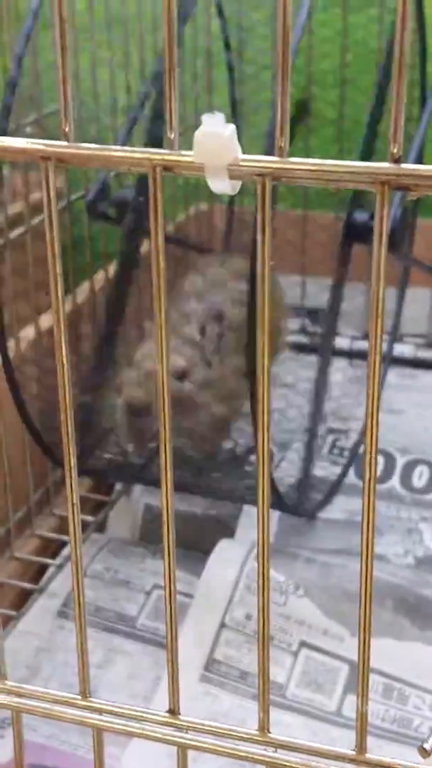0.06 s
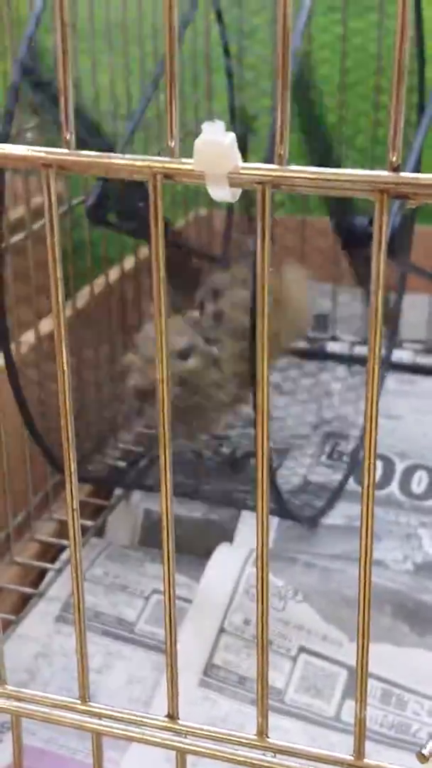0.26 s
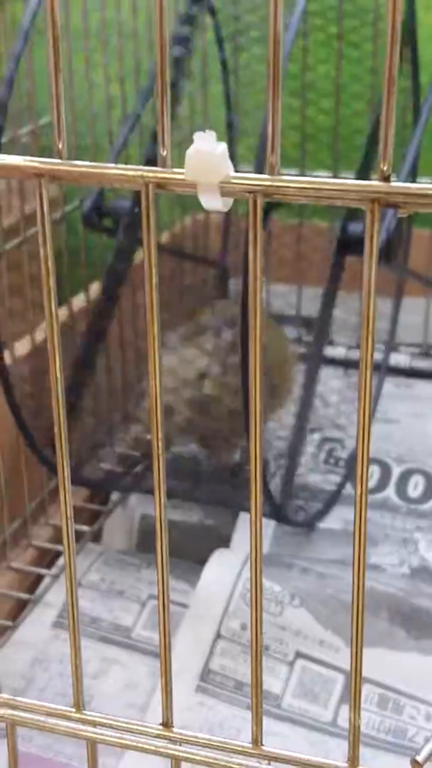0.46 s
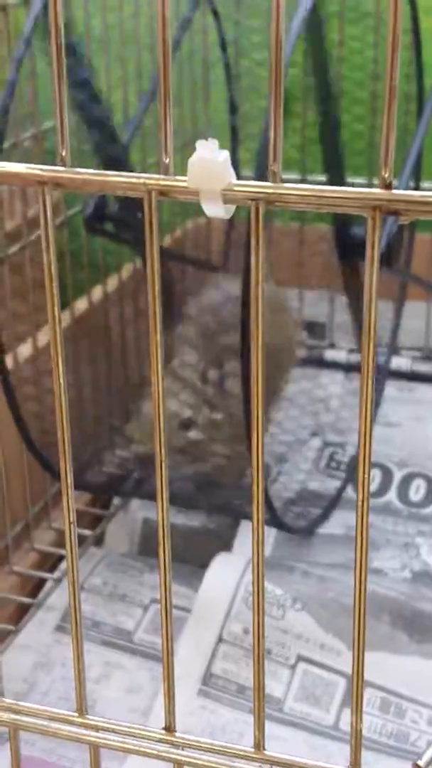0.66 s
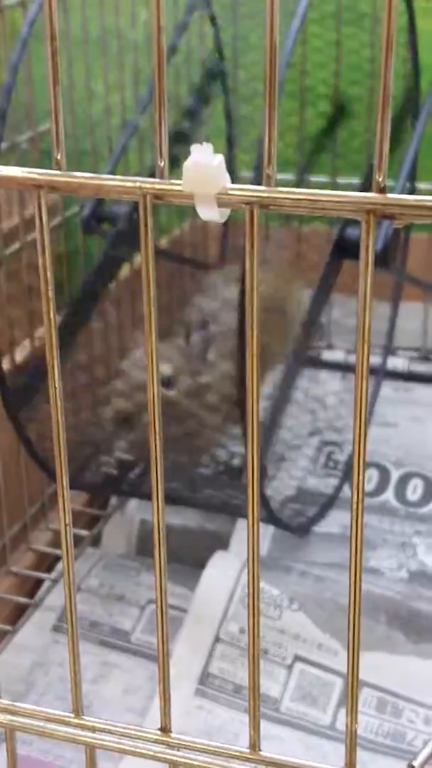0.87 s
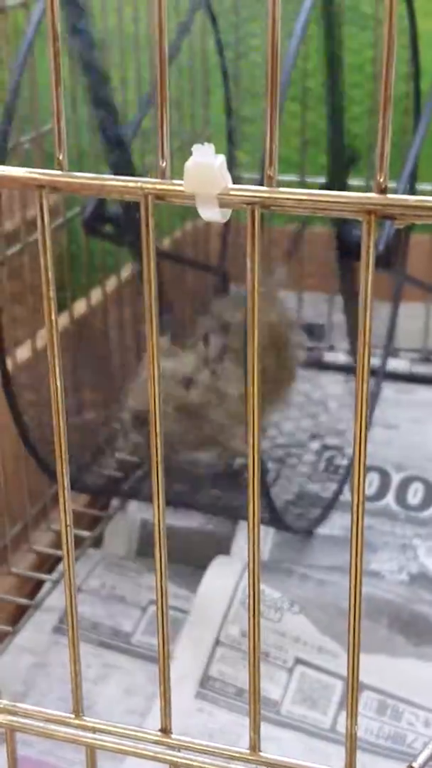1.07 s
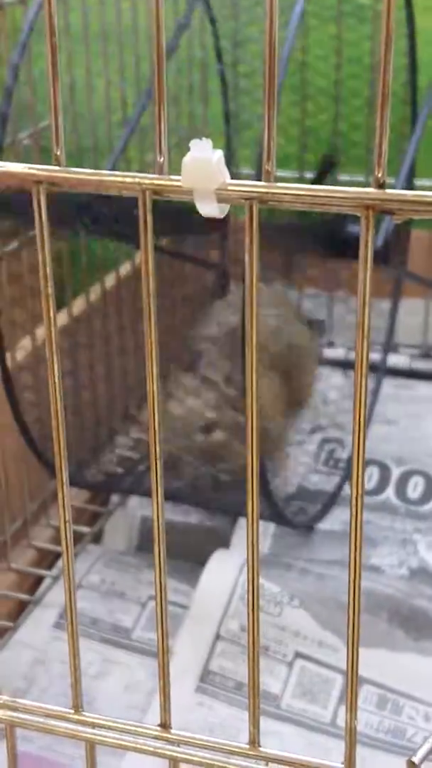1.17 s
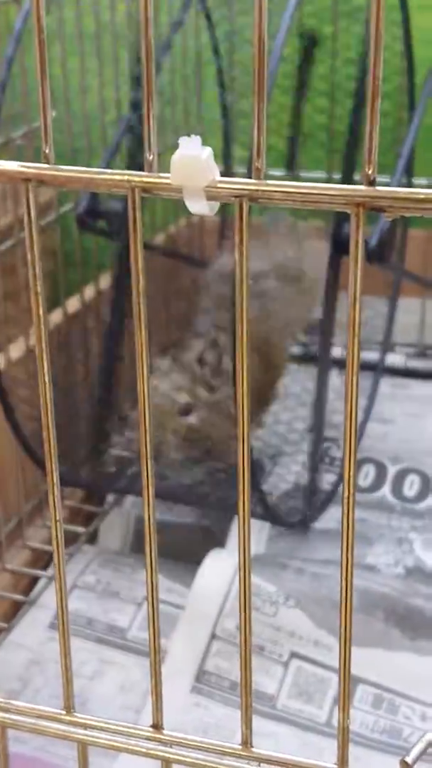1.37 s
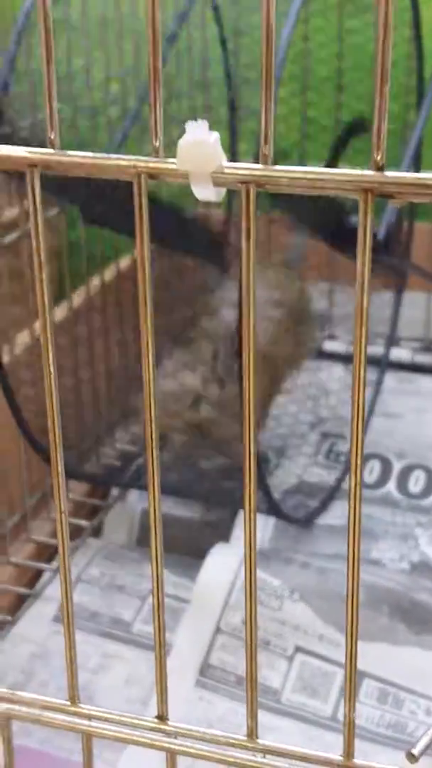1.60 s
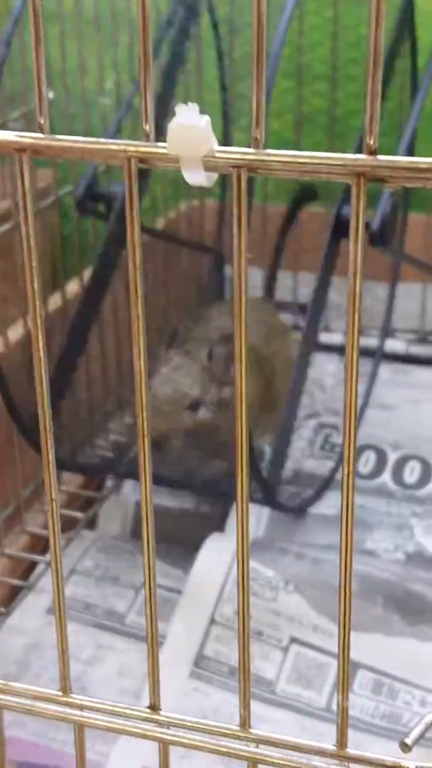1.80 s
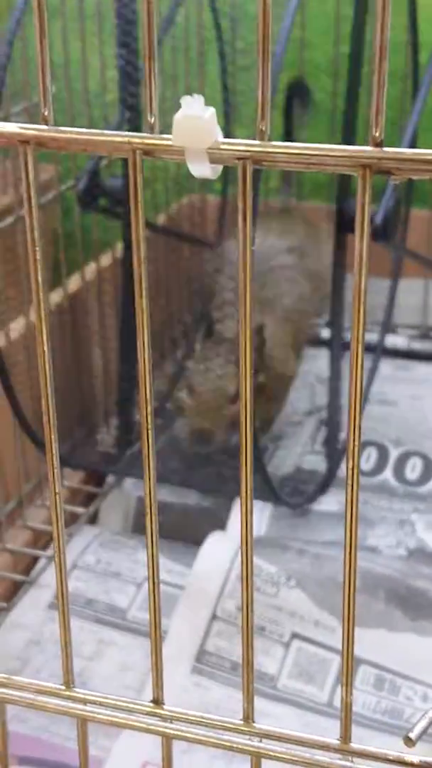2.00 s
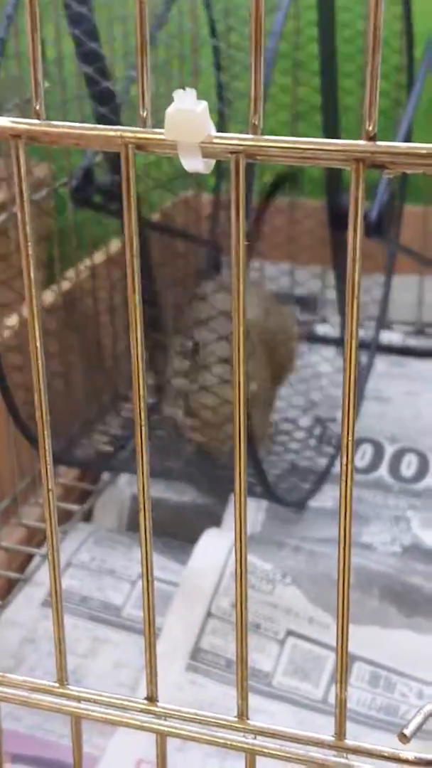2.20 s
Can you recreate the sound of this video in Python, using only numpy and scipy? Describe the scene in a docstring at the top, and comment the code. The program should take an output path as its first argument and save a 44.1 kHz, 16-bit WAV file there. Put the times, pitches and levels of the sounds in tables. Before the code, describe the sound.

High, short squeaks come from a small rodent or its running wheel, slightly to the right, ringing briefly in the room. They are raspy from 0.1 to 0.5 seconds, then clear and louder from 0.6 to 1.7, peaking around 0.8 and 1.4. A faint falling squeak follows at about 2 seconds. Feet patter and scuff lightly on the mesh throughout, over a low indoor rumble.

```python
"""A bare, echoing room: a small rodent runs in a mesh wheel inside a wire cage.
A quick run of high squeaks from the animal or its wheel, hoarse at first and then clear, rings on in
the room. Each is a gliding, wavering whistle with overtones, roughened by rasp and growl.
Feet patter and scuff on the mesh and ring the wheel, over a low indoor rumble."""
import sys
import numpy as np
from scipy import signal
from scipy.fft import rfft, irfft
from scipy.io import wavfile

SR = 44100
rng = np.random.default_rng(int(sys.argv[2]) if len(sys.argv) > 2 else 0)


def to_wav(s):
    """Save 16-bit WAV."""
    ch = np.atleast_2d(s).T  # columns
    pcm = np.round(np.clip(ch, -1, 1) * 32767)  # PCM
    wavfile.write(sys.argv[1], SR, pcm.astype(np.int16))


N = 99225
TIME_S = np.arange(N) / SR
FREQS_HZ = np.arange(N // 2 + 1) * SR / N

# Left-right likeness of noise: freq_hz, correlation
STEREO_CORRELATION = [(50, .9), (150, 1), (350, 0.59), (700, 0.85), (1400, .1), (5000, 0.052)]
# Indoor rumble and hiss: freq_hz, density_db
AIR_SPECTRUM = [(25, -39), (36, 1), (47, 1), (75, 2.5), (120, -9.5), (170, -4), (330, -18), (600, -25),
                (1400, -24.5), (3000, -25), (6000, -29), (9500, -53), (12000, -49), (15500, -67)]
# Footfalls on the wheel: peak_s, level_db
FOOTFALLS = [(.345, -41), (0.364, -58), (0.402, -46.5), (0.486, -45), (0.644, -43.5), (0.964, -45),
             (1.047, -47.5), (1.192, -39), (1.21, -69), (1.264, -41.5), (1.325, -41.5), (1.383, -40),
             (1.424, -41), (1.446, -45), (1.774, -39.5), (1.814, -46.5), (1.846, -46.5), (1.921, -44.5),
             (2.152, -39.5)]
# Feet scuffing the mesh: time_s, level_db
SCUFF_ENVELOPE = [(0, -47.5), (.12, -57), (.45, -51.5), (.8, -57), (1.15, -52.5), (1.40, -49.5),
                  (1.65, -55.5), (1.85, -52.5), (2.05, -52), (2.25, -53.5)]
# Mesh contact noise: freq_hz, density_db
MESH_SPECTRUM = [(120, -11.5), (220, 1), (350, -7), (560, -7.5), (900, -5), (1450, -6), (2150, -2.5),
                 (3200, -8), (5500, -21), (9000, -26), (12000, -46), (15500, -42)]
# Wheel resonances: freq_hz, width_hz, lift_db
WHEEL_RESONANCES = [(510, 150, 6), (595, 39, 11.5), (844, 67, 8), (1023, 61, 4), (1484, 16, 5.5),
                    (1800, 20, 1), (2150, 67, 2.5)]
# Noise in a squeak: freq_hz, density_db
RASP_SPECTRUM = [(1200, -26), (2200, 5), (3000, 18), (4400, 13.5), (6200, 14.5), (8500, 8.5), (10200, -2.5),
                 (12000, -6.5), (15500, -27)]
# A hoarse squeak repeats every third cycle: multiple_of_third_pitch, level_re_rasp_db
GROWL_PARTIALS = [(2, -7), (4, -11), (5, -8), (7, -20)]
# Squeaks; rows that touch are one squeak breaking to a new pitch:
# start_s, length_s, crest_share, start_hz, crest_hz, end_hz, level_db, octave_db, waver_share, rasp_db
SQUEAK_GLIDES = [ (0.116, 0.058, 0.24, 4730, 4450, 4110, -42, -34, 0.053, -16.5),
                 (0.147, 0.094, 0.58, 4000, 4035, 4053, -36, -18.5, .028, -12),
                 (0.227, 0.12, 0.52, 3600, 2698, 2660, -40.5, -34, 0.043, -7.5),
                 (0.311, 0.046, 0.44, 2843, 2853, 2770, -35, -10, 0.021, -17),
                 (0.311, .080, .60, 4080, 4159, 4280, -31.5, -19, 0.024, -5.5),
                 (0.461, 0.04, 0.362, 3036, 3077, 3343, -41, 6.5, 0.014, -0.5),
                 (0.473, 0.0635, 0.77, 4160, 4293, 4120, -28.5, -9.5, 0.014, -8),
                 (0.636, 0.081, 0.7, 4532, 4324, 4216, -23, -15, 0.031, -22),
                 (0.794, 0.025, 0.29, 1985, 1910, 1840, -45.5, -8, 0.015, -7),
                 (0.807, .056, 0.64, 3896, 4150, 4236, -19.5, -19, 0.023, -33.5),
                 (.856, 0.028, 0.474, 4466, 4514, 4136, -21.5, -27.5, 0.027, -19.5),
                 (0.969, 0.081, 0.29, 4380, 4594, 4367, -23.5, -17.5, 0.033, -37),
                 (1.046, 0.026, .50, 1920, 1890, 1800, -48.5, -13, .012, -5),
                 (1.127, 0.057, 0.597, 4685, 5054, 4690, -26.5, -13, 0.0388, -30),
                 (1.352, 0.056, 0.67, 3850, 4520, 4627, -30.5, -12, 0.019, -37),
                 (1.409, 0.039, 0.57, 4420, 4665, 4780, -17, -22, 0.028, -52),
                 (1.664, .054, .70, 4490, 4608, 4483, -24, -14.5, 0.027, -33),
                 (1.7, 0.041, 0.55, 4416, 4190, 4150, -25, -22, 0.023, -35),
                 (1.973, 0.095, 0.344, 3350, 3130, 2853, -52, -38, 0.035, -21),
                 (2.038, 0.077, 0.63, 2690, 2364, 2330, -48.5, -30, 0.048, -24), ]
# Microphone imbalance: freq_hz, left_minus_right_db
MIC_BALANCE = [(60, -2.5), (200, -5.5), (380, 4.5), (700, -4.5), (1300, -1.5), (4400, -2.5), (6500, -3),
               (8500, -9.5), (10200, -11.5), (13000, 0)]


def from_db(db):
    """Decibels to gain."""
    return 10 ** (np.asarray(db) / 20)


def unit_rms(x):
    """Scale to unit power."""
    return x / np.sqrt(np.mean(x ** 2) + 1e-20)


def at_hz(table, hz):
    """Read a table on a log-frequency axis."""
    freq_hz, value = np.transpose(table)
    return np.interp(np.log(hz + 1), np.log(freq_hz), value)


def drift(cutoff_hz):
    """Low-passed random motion, unit RMS."""
    pole = np.exp(-2 * np.pi * cutoff_hz / SR)
    white = rng.standard_normal(N + SR // 2)
    return unit_rms(signal.lfilter([1], [1, -2 * pole, pole * pole], white)[-N:])


def stereo_noise(spectrum):
    """Coloured noise, alike on both sides in the bass, diffuse in the treble."""
    mid, side = rfft(rng.standard_normal((2, N)))
    alike = at_hz(STEREO_CORRELATION, FREQS_HZ)
    pair = np.sqrt(1 + alike) * mid + np.sqrt(1 - alike) * np.array([side, -side])
    return unit_rms(irfft(pair * from_db(at_hz(spectrum, FREQS_HZ)), N))


def room(x, early_t60_s=0.044, late_t60_s=0.36, early_share=0.27, gap_s=0.00091):
    """Dense early reflections and a diffuse tail, different on each side."""
    t = TIME_S[:SR]
    early, late = (unit_rms(from_db(-60 * t / t60_s) * (t > gap_s))
                   for t60_s in (early_t60_s, late_t60_s))
    power = early_share * early ** 2 + (1 - early_share) * late ** 2
    response = rng.standard_normal((2, SR)) * np.sqrt(power / SR)
    return signal.fftconvolve(np.atleast_2d(x), response, axes=1)[:, :N]


def background(air_db=-48, hum_db=-61.5, hum_hz=68.9, waver_share=0.055):
    """Indoor rumble and hiss with a low wavering hum."""
    pitch_hz = hum_hz * (1 + waver_share * drift(cutoff_hz=8.3))
    hum = np.sqrt(2) * np.sin(2 * np.pi * np.cumsum(pitch_hz) / SR)
    return from_db(air_db) * stereo_noise(AIR_SPECTRUM) + from_db(hum_db) * hum


def wheel_ring(contact):
    """The wheel's resonances lift narrow bands of the contact noise."""
    ringing = np.zeros_like(contact)
    for freq_hz, width_hz, lift_db in WHEEL_RESONANCES:
        b, a = signal.iirpeak(freq_hz, freq_hz / width_hz, fs=SR)
        ringing += (from_db(lift_db) - 1) * signal.lfilter(b, a, contact)
    return contact + ringing


def feet(attack_s=0.0031, decay_s=0.022, grain_db=1.5, echo_db=-3.5):
    """Footfalls rattle the mesh, light scuffing runs between them; both ring the wheel."""
    t = TIME_S[:SR // 4]
    pulse = np.minimum(t / attack_s, 1) * np.exp(-t / decay_s)
    force = np.zeros(N)
    for peak_s, level_db in FOOTFALLS:
        onset = int((peak_s - attack_s) * SR)
        force[onset:onset + len(pulse)] += from_db(level_db) * pulse[:N - onset]
    grain = from_db(grain_db * drift(cutoff_hz=530))
    patter = force * grain * stereo_noise(MESH_SPECTRUM)
    echo = from_db(echo_db) * room(patter)
    scuff_db = np.interp(TIME_S, *np.transpose(SCUFF_ENVELOPE))
    scuff = from_db(scuff_db) * stereo_noise(MESH_SPECTRUM)
    return wheel_ring(patter + echo + scuff)


def rasp(grain_db=4.5):
    """Grainy noise of a hoarse squeak; mono, unit RMS."""
    noise = stereo_noise(RASP_SPECTRUM)[0]
    return unit_rms(noise * from_db(grain_db * drift(cutoff_hz=830)))


def whistle(pitch_hz, octave_db, rasp_db):
    """Fundamental, three overtones, and growl at multiples of a third of the pitch."""
    phase = 2 * np.pi * np.cumsum(pitch_hz) / SR
    overtones = sum(from_db(octave_db + db) * np.sin(k * phase) for k, db in [(2, 0), (3, -18), (4, -27)])
    growl = sum(from_db(rasp_db + db) * np.sin(k * phase / 3) for k, db in GROWL_PARTIALS)
    return np.sqrt(2) * (np.sin(phase) + overtones + growl)


def squeaks(swell_db=13.5, fade_db=3.5, edge_s=0.005, flutter_hz=220):
    """Each squeak glides and swells to its crest, fades and stops; pitch and level flutter."""
    waver = unit_rms(np.tanh(2 * drift(flutter_hz)))   # between two limits
    shimmer_db = drift(flutter_hz)
    tone, rasp_gain = np.zeros((2, N))
    for start_s, length_s, crest_share, *glide_hz, level_db, octave_db, waver_share, rasp_db in SQUEAK_GLIDES:
        span = (TIME_S >= start_s) & (TIME_S < start_s + length_s)
        t = TIME_S[span] - start_s
        knots_s = [0, crest_share * length_s, length_s]
        detune = waver_share * (waver[span] - waver[span].mean())
        pitch_hz = np.interp(t, knots_s, glide_hz) * (1 + detune)
        contour_db = np.interp(t, knots_s, [-swell_db, 0, -fade_db])
        flutter_db = shimmer_db[span] - shimmer_db[span].mean()
        gate = np.clip(np.minimum(t, length_s - t) / edge_s, 0, 1)
        gain = gate * from_db(level_db + contour_db + flutter_db)
        tone[span] += gain * whistle(pitch_hz, octave_db, rasp_db)
        rasp_gain[span] += gain * from_db(rasp_db)
    return tone + rasp_gain * rasp()


def squeaks_in_room(left_db=-8.5, right_db=-1.5, right_lag_s=0.00004, echo_db=1):
    """Direct squeaks, louder on the right, plus their room echo."""
    voice = squeaks()
    delayed = np.interp(TIME_S - right_lag_s, TIME_S, voice)
    direct = np.array([from_db(left_db) * voice, from_db(right_db) * delayed])
    return direct + from_db(echo_db) * room(voice)


def scene():
    """Squeaks and feet over the room's background."""
    return squeaks_in_room() + feet() + background()


def record(dry):
    """The right microphone is more sensitive, most in the treble; deep bass and top are cut steeply."""
    fft_size = 2 * N
    lean_db = at_hz(MIC_BALANCE, np.arange(N + 1) * SR / fft_size) / 2
    mics = irfft(rfft(dry, fft_size) * from_db([lean_db, -lean_db]), fft_size)[:, :N]
    low_cut_hz, high_cut_hz = 45, 15800
    highpass = signal.butter(8, low_cut_hz, "high", fs=SR, output="sos")
    lowpass = signal.ellip(10, 0.1, 80, high_cut_hz, fs=SR, output="sos")
    return signal.sosfilt(lowpass, signal.sosfilt(highpass, mics))


dry = scene()
out = record(dry)
to_wav(out)
```